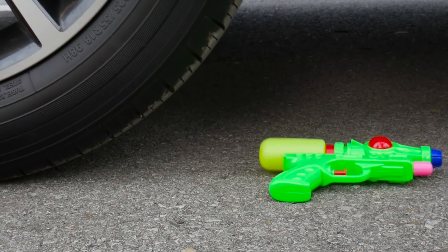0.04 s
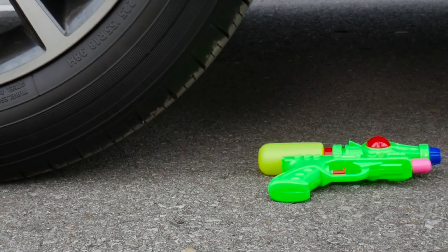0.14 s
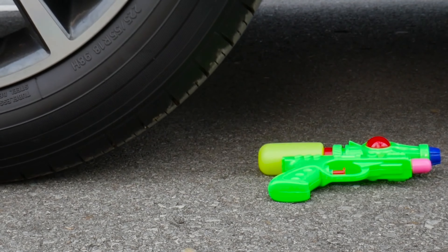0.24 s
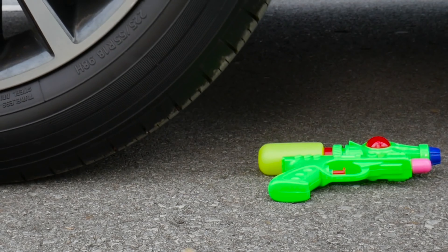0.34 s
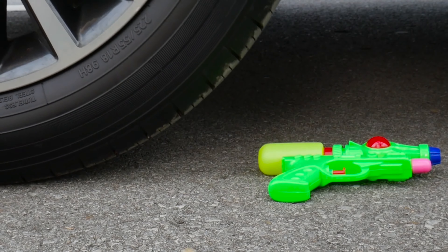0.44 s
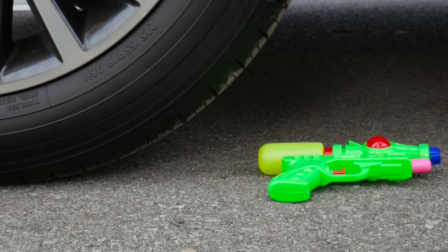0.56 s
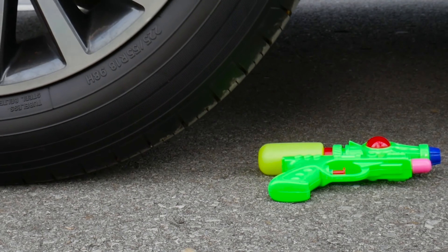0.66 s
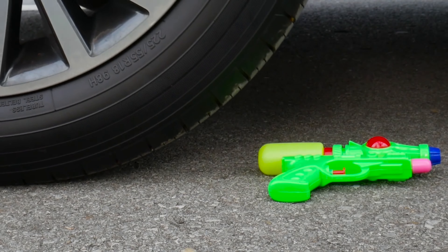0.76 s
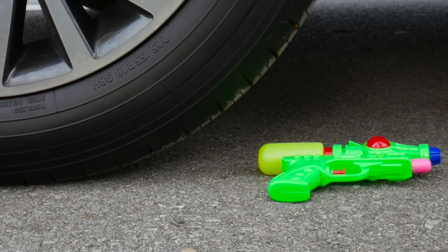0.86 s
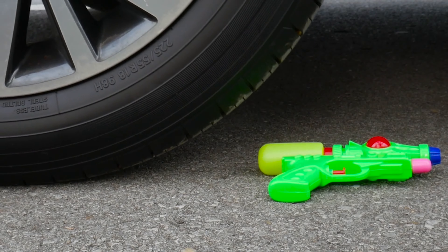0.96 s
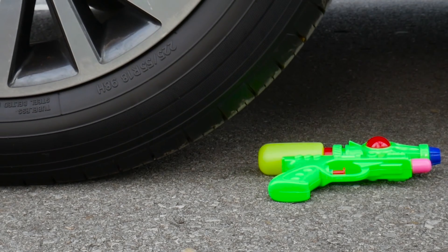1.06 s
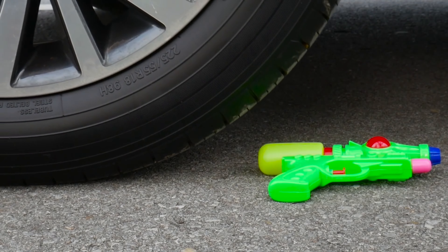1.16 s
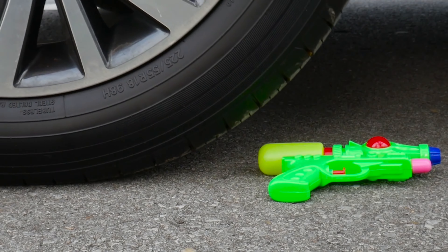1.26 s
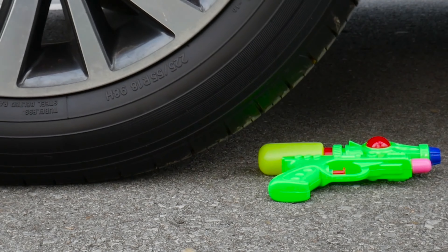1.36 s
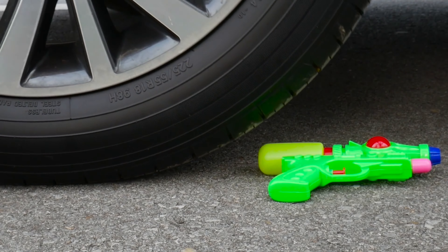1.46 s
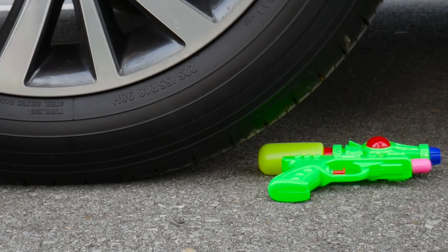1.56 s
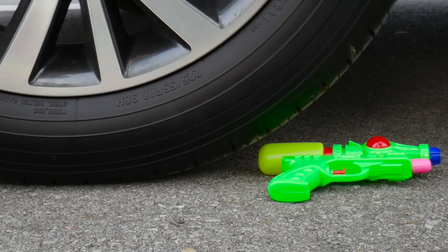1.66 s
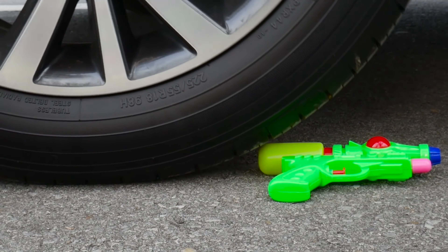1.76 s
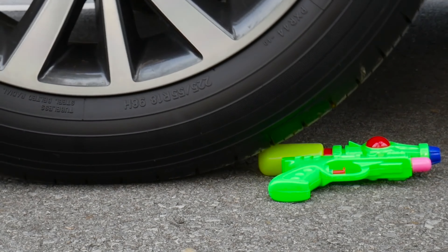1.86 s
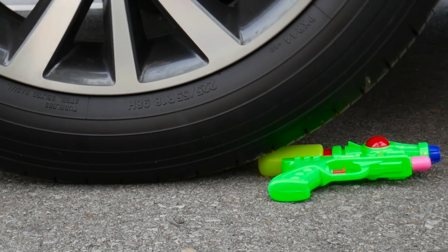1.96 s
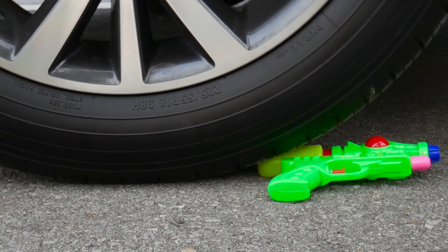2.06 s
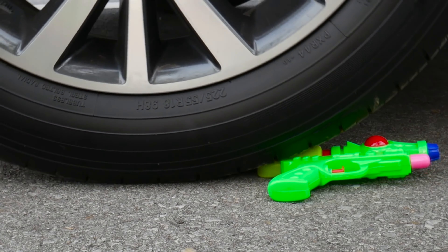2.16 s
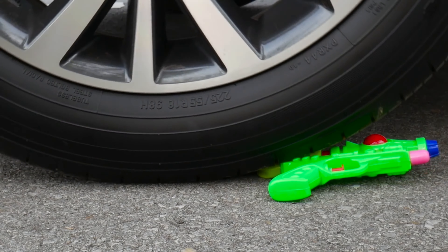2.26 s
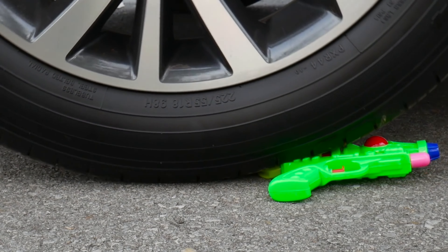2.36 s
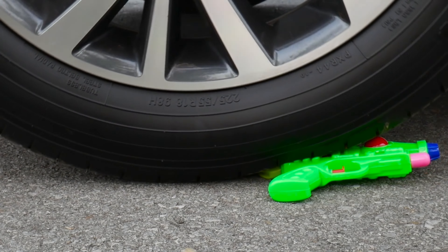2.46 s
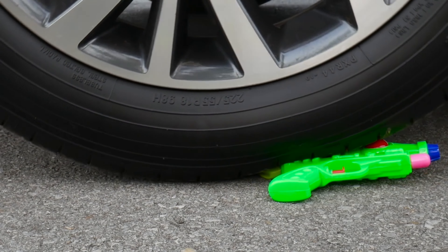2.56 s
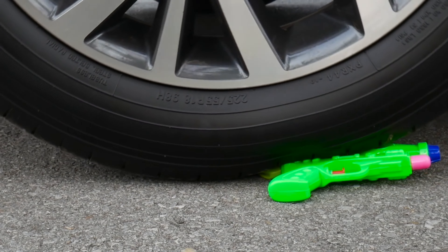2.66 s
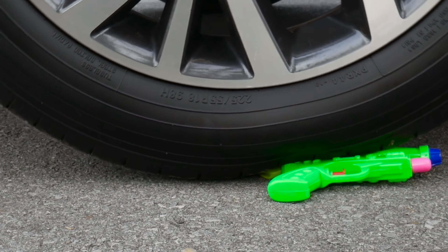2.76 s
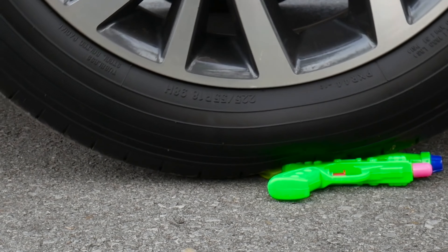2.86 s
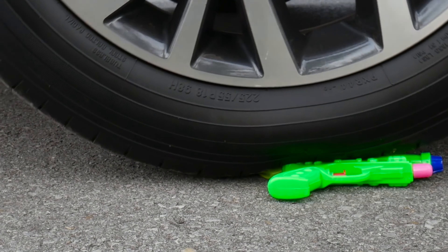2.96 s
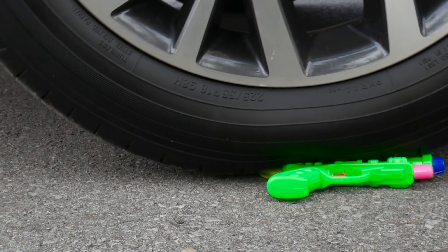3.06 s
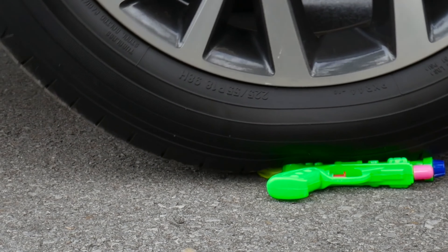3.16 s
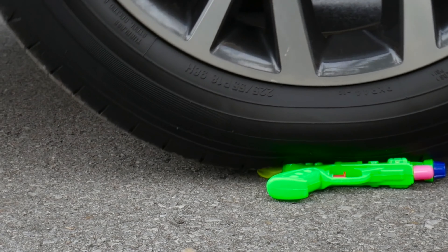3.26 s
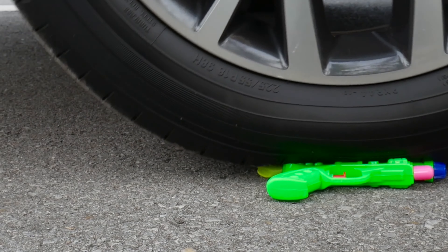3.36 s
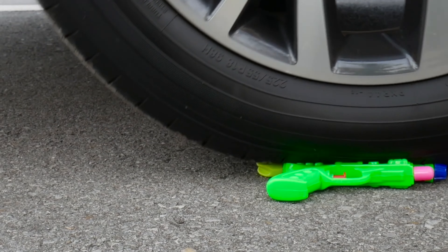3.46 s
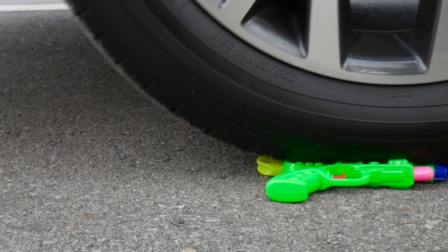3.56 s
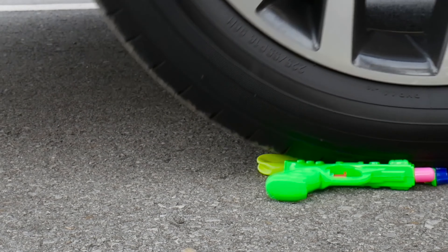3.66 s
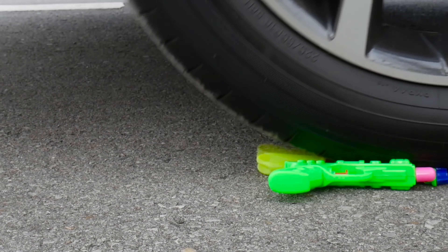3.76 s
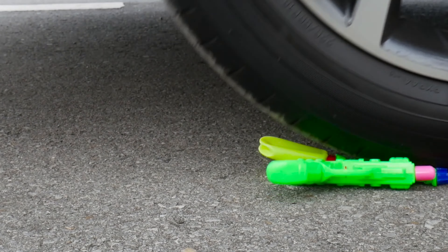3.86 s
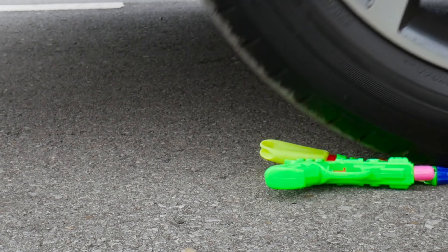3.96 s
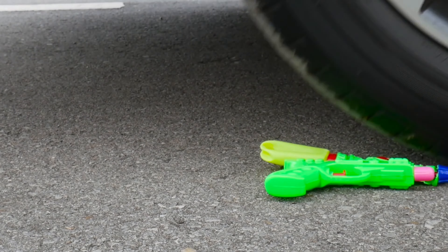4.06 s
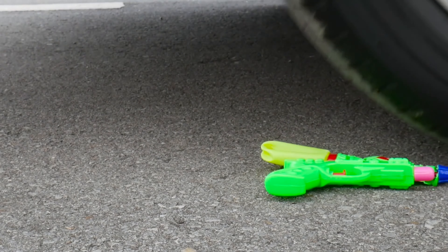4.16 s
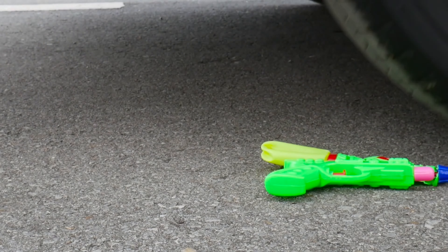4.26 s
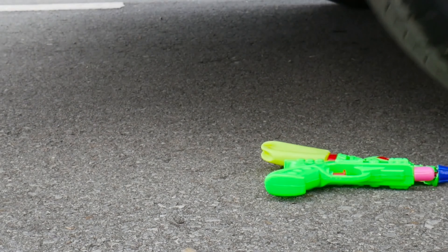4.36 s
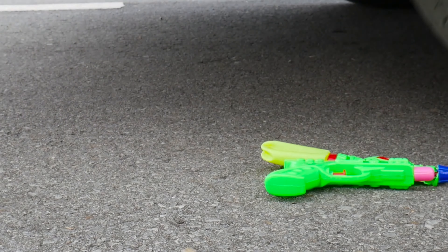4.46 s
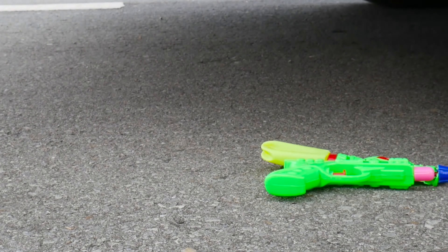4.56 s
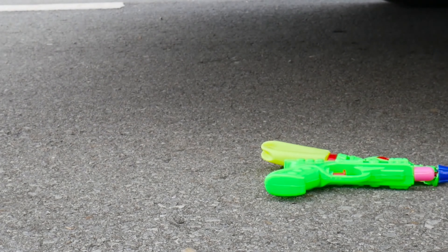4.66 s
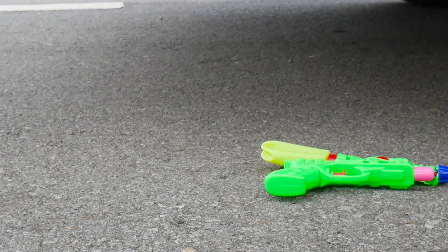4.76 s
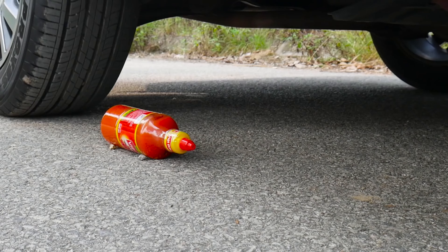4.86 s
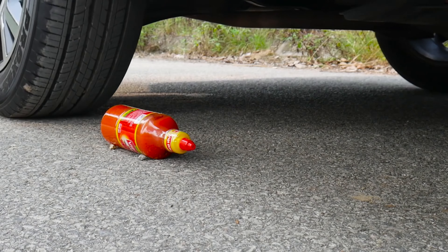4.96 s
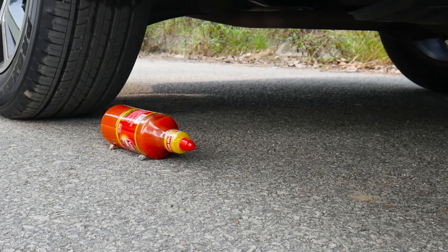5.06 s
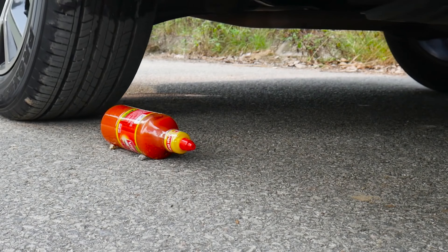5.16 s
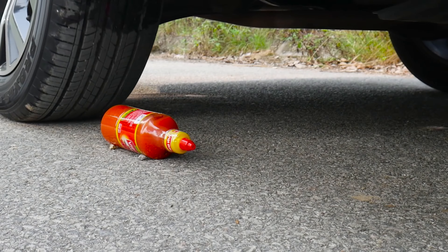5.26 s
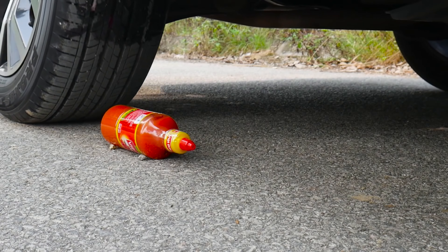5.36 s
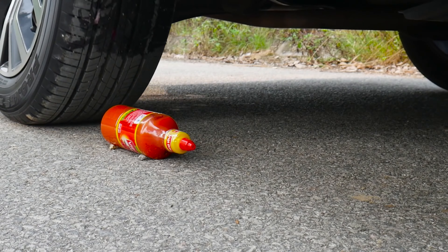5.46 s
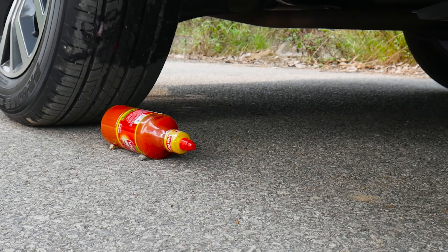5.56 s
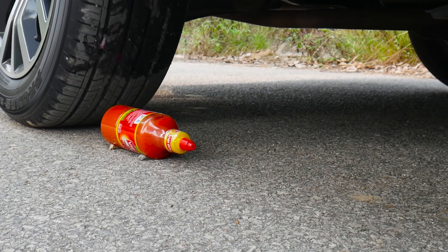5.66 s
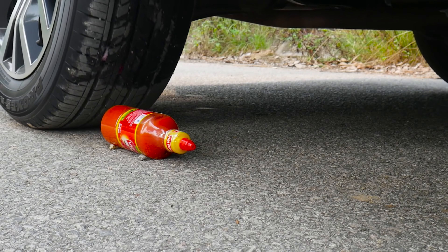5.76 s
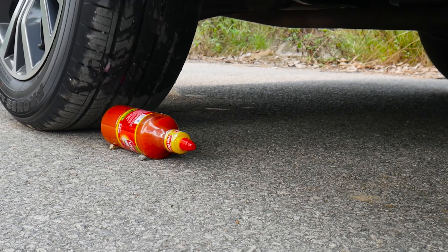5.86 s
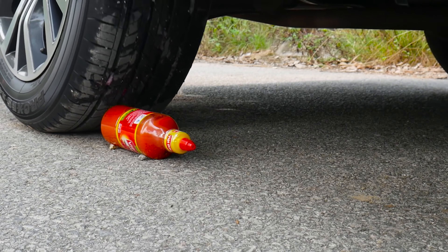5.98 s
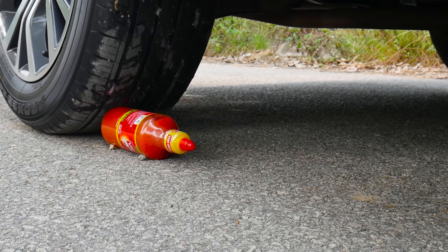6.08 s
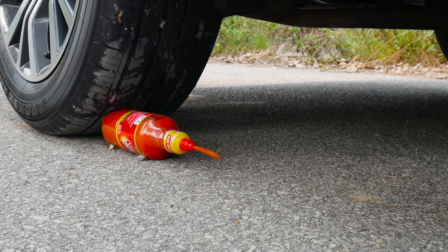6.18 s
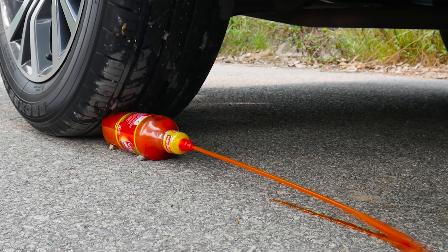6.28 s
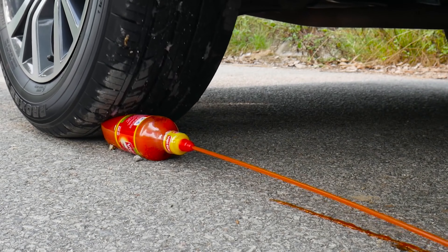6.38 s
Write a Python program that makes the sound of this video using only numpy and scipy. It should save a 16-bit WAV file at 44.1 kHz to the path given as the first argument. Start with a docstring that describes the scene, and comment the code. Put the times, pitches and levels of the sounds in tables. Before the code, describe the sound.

Brittle plastic crunches and snaps violently under a slow car wheel, engine idling softly; after a lull, a soft bottle buckles with a gurgling squirt.

```python
"""On asphalt, close to the tyre of an idling car that creeps over a plastic water pistol
and then noses into a plastic sauce bottle. Shells snap as noise bursts with a ringing pitch, so hard that
the stereo microphone overloads; random grains make the scrunch and the grit under the tread, jolts set
the air inside the tyre humming, and sauce gushes and glugs. The engine sums firing orders, rumble and whirr."""
import sys
import numpy as np
from scipy import signal
from scipy.fft import rfft, irfft
from scipy.io import wavfile
from scipy.ndimage import uniform_filter1d

SR = 44100
rng = np.random.default_rng(int(sys.argv[2]) if len(sys.argv) > 2 else 0)


def dump(signal):
    """Clip the signal to [-1, 1] and save it as 16-bit WAV at the path in sys.argv[1]."""
    limited = np.clip(np.atleast_2d(signal).T, -1, 1)
    pcm = np.round(limited * 32767).astype(np.int16)
    wavfile.write(sys.argv[1], SR, pcm)


N = 283122
TIME = np.arange(N) / SR

# plastic giving way; splinter and knock levels are the rms of their first 5 ms:
# (time [s], crack peak [dB], shell pitch [Hz], splinter treble [dB], knock [dB], knock pitch [Hz])
SNAPS = [(0.0098, -13, 3940, -36, -29.5, 980), (0.0309, -6.5, 4200, -22.5, -28, 1110),
         (0.0548, -25, 5370, -40, -28, 864), (0.0656, -16, 4100, -27, -33, 1005),
         (0.0961, -10.5, 3920, -44, -54, 500), (0.117, -11, 3440, -30, -48, 990),
         (2.2109, -20, 4370, -32, -53, 890), (2.3844, -0.5, 2680, -7, -21, 1150),
         (2.4563, -7.5, 2735, -11, -45, 940), (2.603, -1, 6550, -8, -20, 1180),
         (2.6284, 1, 3900, -7.5, -19, 1130), (2.6805, 1, 3120, -8.5, -19.5, 860),
         (2.699, -8.5, 6200, -19, -28.5, 1170), (2.7309, -1.5, 3930, -13.5, -29.5, 1150),
         (2.7629, -10.5, 6170, -24, -36.5, 1160), (2.7715, -8.5, 4100, -17, -29.5, 810),
         (2.7952, -10, 4940, -23, -39.5, 839), (2.8063, -8, 5670, -13.5, -32.5, 1170),
         (2.8154, -9.5, 5100, -14, -35.5, 578.5), (2.8285, -6, 4020, -16.5, -28.5, 815),
         (2.871, -1, 6900, -10, -22, 954), (2.9569, -6, 4190, -13, -28.5, 670),
         (3.0124, -2, 4590, -13, -23.5, 714), (3.054, 2, 4950, -10, -21.5, 1054),
         (3.092, -8, 4700, -20, -33.5, 694), (3.1074, 0.5, 3470, -8, -15.5, 1068),
         (3.1196, -10.5, 4050, -16, -31.5, 840), (3.1248, -11.5, 5000, -20.5, -35, 740),
         (3.1638, -7, 4980, -17, -36, 590), (3.1772, -4, 5200, -12, -32.5, 843.5),
         (3.2206, -8, 2290, -16, -35.5, 670), (3.251, -13, 6600, -20, -37, 1055),
         (3.266, -3.5, 4100, -10.5, -24, 588), (3.3006, -10.5, 2310, -16.5, -24, 830),
         (3.3651, -9.5, 4620, -18, -39, 860), (3.394, -6, 4530, -17.5, -37, 654),
         (3.4097, -6, 6600, -13.5, -38.5, 690), (3.424, -14.5, 7100, -26, -38, 900),
         (3.4464, 1.5, 4140, -14, -21, 577), (3.4544, -23, 2700, -18.5, -22.5, 884),
         (3.5035, -8, 3800, -15.5, -23, 760), (3.5563, -1.5, 4550, -11.5, -25.5, 746),
         (3.5757, -12.5, 1830, -20.5, -27.5, 830), (3.584, -22.5, 1310, -26, -27.5, 786),
         (3.632, -23, 6750, -15, -41, 666), (3.6384, -18, 4440, -31, -27, 833),
         (3.692, -3.5, 4570, -10.5, -28, 976), (3.7473, -9, 1950, -18, -26.5, 790),
         (3.7757, -12.5, 4720, -20, -21.5, 870), (3.8248, -19, 3830, -37, -31.5, 960),
         (3.847, -12.5, 2440, -25, -26.5, 780), (3.8513, -15, 3480, -17, -22, 794),
         (3.869, -30, 6000, -37, -29, 735), (3.925, -10.5, 3390, -25, -32, 547),
         (4.0431, -18.5, 2780, -28, -36.5, 684)]
# span of the pistol's crushing and its aftermath; span of the wheel's weight on it (start, end)
PISTOL_SPAN_S, LOADED_S = (2, 5), (2.55, 4.1)


def undb(db):
    """Amplitude of a level in dB."""
    return 10 ** (np.asarray(db) / 20)


def unit(x):
    """Scale x to rms 1."""
    return x / np.sqrt(np.mean(x ** 2))


def early_unit(x):
    """Scale x so that its first 5 ms have rms 1."""
    return x / np.sqrt(np.mean(x[:int(0.005 * SR)] ** 2))


def fade(t, t60):
    """Exponential decay by 60 dB in t60 seconds."""
    return np.exp(-np.log(1000) * t / t60)


def band(x, lo_hz, hi_hz, order=2):
    """Keep the band between two frequencies."""
    edges_hz = [lo_hz, min(hi_hz, SR / 2 - 500)]
    return signal.sosfilt(signal.butter(order, edges_hz, "band", fs=SR, output="sos"), x)


def colour(x, points):
    """Give x a smooth spectrum through (frequency [Hz], level [dB]) points; rms 1."""
    f = np.arange(N // 2 + 1) * SR / N + 1  # 1 Hz up, to avoid log(0)
    hz, db = np.transpose(points)
    gain = undb(np.interp(np.log(f), np.log(hz), db))
    return unit(irfft(rfft(x) * gain, N))


def walk(rate):
    """Smooth random wandering of rms 1, with `rate` new random values a second."""
    k = int(SR / rate)
    steps = np.repeat(rng.standard_normal(N // k + 1), k)
    return unit(uniform_filter1d(uniform_filter1d(steps, k), k)[:N])


def step(at_s, over_s):
    """A smooth change from 0 to 1."""
    return 0.5 + 0.5 * np.tanh((TIME - at_s) / over_s)


def add(out, at_s, x):
    """Mix x into out from a given moment on."""
    start = int(at_s * SR)
    out[start:start + len(x)] += x[:N - start]


def grains(rate, spread_db, t60):
    """Random tiny fractures, `rate` a second and of unequal size, each a short noise burst."""
    sizes = undb(spread_db * np.minimum(rng.exponential(size=N), 3.3))
    hits = (rng.random(N) < rate / SR) * sizes
    energy = signal.lfilter([1], [1, -fade(2 / SR, t60)], hits ** 2)
    return np.sqrt(energy) * rng.standard_normal(N)


def whirr(spectrum, lines, drift=0.005, unsteady_db=3):
    """Fan and belt noise with whining lines that drift and flutter."""
    out = colour(rng.standard_normal(N), spectrum)
    for hz, db in lines:
        phase = 2 * np.pi * np.cumsum(hz * (1 + drift * walk(16))) / SR
        out = out + undb(db) * unit(undb(unsteady_db * walk(31)) * np.sin(phase))
    return out


def engine(firing_hz=21.6, flicker_db=1.6, throb=0.12, unsteady_db=0.5, gas_db=-2):
    """Exhaust firing orders and gas rumble under an engine-bay whirr that throbs at the firing rate."""
    # exhaust tones: (multiple of the firing rate [1], level [dB])
    exhaust_orders = [(3, -4.5), (4, -1.5), (5, -5), (6, -3.5), (8, -9)]
    # whirr spectra beside and behind the wheel, and from the front: (frequency [Hz], level [dB])
    whirr_side = [(30, -21), (90, -8.5), (200, -4.5), (400, -0.5), (560, -2.5), (900, -0.5), (1550, -8),
                  (2600, -9.5), (3200, -5.5), (3700, -10), (5200, -17.5), (11000, -22.5), (15500, -31)]
    whirr_front = [(30, -4), (85, -7), (200, -7), (450, 1), (700, 4.5), (1100, 3), (1600, -5.5),
                   (3100, -3.5), (5500, -13.5), (8300, -15.5), (11000, -12.5), (15500, -23)]
    # whining belts and alternator: (frequency [Hz], level relative to the whirr [dB])
    whine_side = [(425, -12.5), (818, -11), (866, -14), (1007, -13.5)]
    whine_front = [(172.8, -12), (259, -15), (415, -15.5), (692, -9.5)]

    # heard from beside the wheel, from behind it once it has rolled past, then from the front
    past = step(4.7, 0.037)
    ahead = step(4.91, 0.01)
    beside_db = -50 - 2.5 * TIME  # fades by 2.5 dB a second
    side = (1 - ahead) * ((1 - past) * undb(beside_db) + past * undb(-63.5))
    front = ahead * undb(-55.5)
    exhaust = (1 - ahead) * ((1 - past) * undb(-71.5) + past * undb(-65.5)) + ahead * undb(-75)

    phase = 2 * np.pi * np.cumsum(firing_hz * (1 + 0.00035 * walk(6.9))) / SR
    hum = 0
    for order, db in exhaust_orders:
        tone = np.sqrt(2) * np.sin(order * phase + 2 * np.pi * rng.random())
        hum = hum + undb(db + unsteady_db * walk(1.9)) * tone
    # spent gas rumbles steadily
    hum = hum + undb(gas_db) * unit(band(rng.standard_normal(N), 55, 380))
    bay = side * whirr(whirr_side, whine_side) + front * whirr(whirr_front, whine_front)
    return exhaust * hum + bay * undb(flicker_db * walk(6.4)) * (1 + throb * np.sin(phase))


def splintering(full_snap_db=-28.5, build_t60=0.025, linger_t60=0.11):
    """Strength of the crackle around each snap under full load, and again as the tyre lets the shell go."""
    hits = np.zeros(N)
    for start_s, crack_db, *_ in SNAPS:
        if LOADED_S[0] < start_s < LOADED_S[1]:
            hits[int(start_s * SR)] += undb(crack_db)
    linger = lambda x, t60: signal.lfilter([1], [1, -fade(2 / SR, t60)], x + 1e-18)
    # run backwards, the same decay becomes the build-up before a snap
    energy = linger(hits, linger_t60) + linger(hits[::-1], build_t60)[::-1]
    let_go = undb(-37.5) * np.exp(-((TIME - 3.95) / 0.075) ** 2)
    return undb(full_snap_db) * np.sqrt(energy) + let_go


def crunches(count=1700, low_hz=1700, high_hz=5600, t60=0.009):
    """Tiny creases and chips: a dense scatter of pings, each with its own pitch and size; rms 1."""
    t = np.arange(SR // 20) / SR
    out = np.zeros(N)
    for when, pitch, size in rng.random((count, 3)):
        hz = low_hz * (high_hz / low_hz) ** pitch
        add(out, when * N / SR, size ** 4 * np.sin(2 * np.pi * hz * t) * fade(t, t60))
    return unit(out)


def tread(splinter_scrunch_db=-13, surge_db=2, crunch_splinter_db=-5, crunch_grit_db=-6):
    """Rubber scrunches on the asphalt while grit, small chips and fine, brighter splinters crackle under it."""
    # the tread bearing down on an object or loose grit:
    # (start [s], end [s], scrunch level [dB], grit crackle level [dB])
    presses = [(0, 0.138, -39, -36.5), (2.203, 4.026, -44.5, -54.5), (4.696, 4.72, -61, -84),
               (6.151, 6.42, -40, -49)]
    # spectra of rubber, grit and splinters: (frequency [Hz], level [dB])
    scrunch_tone = [(30, -15.5), (100, -4), (370, -4.5), (550, -3), (850, 0), (1500, -7.5), (3000, -12),
                    (6000, -17), (15000, -21)]
    grit_tone = [(300, -22), (1500, -3.5), (3000, 4), (4500, -1), (6000, -11.5), (11000, -8.5),
                 (15500, -22)]
    splinter_tone = [(300, -20), (1500, -7.5), (3000, 0), (4500, 0.5), (6000, -6), (10500, 2), (12500, -5),
                     (15500, -15)]
    rise_db_per_s, scrunch_fall_db_per_s, grit_fall_db_per_s = 181, 84, 161

    splinters = splintering()
    scrunch, grit = undb(splinter_scrunch_db) * splinters, 0
    for start_s, end_s, scrunch_db, grit_db in presses:
        onset_db = rise_db_per_s * np.minimum(TIME - start_s, 0)
        since = np.maximum(TIME - end_s, 0)
        scrunch = np.hypot(scrunch, undb(scrunch_db + onset_db - scrunch_fall_db_per_s * since))
        grit = np.hypot(grit, undb(grit_db + onset_db - grit_fall_db_per_s * since))
    stones = colour(grains(rate=800, spread_db=3, t60=0.008), grit_tone)
    shards = colour(grains(rate=400, spread_db=5.5, t60=0.005), splinter_tone)
    rubber = colour(grains(rate=1000, spread_db=-0.5, t60=0.033), scrunch_tone)
    crackle = grit * stones + splinters * unit(undb(surge_db * walk(45)) * shards)
    chips = (undb(crunch_splinter_db) * splinters + undb(crunch_grit_db) * grit) * crunches()
    return scrunch * rubber + crackle + chips


def groans(edge_s=0.011, width=0.23, slips_per_s=540):
    """Irregular slips of sticky rubber on hollow plastic excite one broad resonance of the object."""
    # (start [s], end [s], resonance [Hz], level [dB])
    rubs = [(0, 0.1, 1020, -36), (0.1, 0.17, 1150, -43), (2.11, 2.38, 370, -49), (2.675, 2.72, 285, -35),
            (3.84, 3.885, 485, -41)]
    out = np.zeros(N)
    for start_s, end_s, hz, db in rubs:
        slips = grains(rate=slips_per_s, spread_db=4.5, t60=0.0012)
        body = unit(band(slips, hz / (1 + width), hz * (1 + width)))
        out += undb(db) * body * step(start_s, edge_s) * (1 - step(end_s, edge_s))
    return out


def snap(t, row, noise, splinter_t60=0.012, knock_t60=0.022, scuff_db=2, thump_db=-31, thump_t60=0.0087,
         below=0.45, above=1.68, knock_thump_db=-15, overtone_ratio=1.4, overtone_db=-5):
    """One fracture: a burst of tearing, a ring of the shell, and a knock as the piece hits tyre and road."""
    start_s, crack_db, shell_hz, splinter_db, knock_db, knock_hz = row
    loaded = LOADED_S[0] < start_s < LOADED_S[1]
    crack_t60 = 0.013 if loaded else 0.018
    # only the pistol's first cracks, before the weight is on it, ring out freely
    free = PISTOL_SPAN_S[0] < start_s < LOADED_S[0]
    # decay of a piece pitched at 3 kHz, and level of its ring against the tearing
    ring_t60, shell_db = (0.028, -0.5) if free else (0.011, -2.5)
    shell_t60 = ring_t60 * (3000 / shell_hz) ** 0.22  # higher pieces die sooner
    attack = 1 - np.exp(-t / 0.0004)

    # small stiff pieces crack higher than large soft ones
    tear = band(noise[0] * attack * fade(t, crack_t60), below * shell_hz, above * shell_hz)
    shell = np.sin(2 * np.pi * shell_hz * t) * attack * fade(t, shell_t60)
    # a shell that rings for longer also holds more of the energy
    shell_gain = undb(shell_db) * np.sqrt(shell_t60 / crack_t60)
    crack = early_unit(tear) + shell_gain * early_unit(shell)
    crack = undb(crack_db) * crack / np.abs(crack).max()

    # fine splinters fill the treble above the main crack
    splinter_lo_hz = np.clip(above * shell_hz, 4300, 6500)
    splinter = band(noise[1] * attack * fade(t, splinter_t60), splinter_lo_hz, 13000, order=3)

    wall = np.sin(2 * np.pi * knock_hz * t)
    wall = wall + undb(overtone_db) * np.sin(2 * np.pi * overtone_ratio * knock_hz * t)
    knock = early_unit(wall * attack * fade(t, knock_t60))
    scuff = early_unit(band(noise[2] * fade(t, knock_t60), 0.45 * knock_hz, 2.34 * knock_hz))
    knock = early_unit(knock + undb(scuff_db) * scuff)

    # the rubber takes up the sudden release with a dull thump
    thump = early_unit(band(fade(t, thump_t60 / 10) + noise[3] * fade(t, thump_t60), 48, 560))
    thump = undb(max(crack_db + thump_db, knock_db + knock_thump_db)) * thump
    return crack + undb(splinter_db) * early_unit(splinter) + undb(knock_db) * knock + thump


def plastic():
    """All the snaps of the breaking shells, each at its moment."""
    size = 4096
    t = np.arange(size) / SR
    out = np.zeros(N)
    for row, noise in zip(SNAPS, rng.standard_normal((len(SNAPS), 4, size))):
        add(out, row[0], snap(t, row, noise))
    return out


def splinter_ticks(t60=0.026, rise_s=0.0003, spread=1.3):
    """Small splinters, too light to knock, part with one short, bright tick of band-limited noise each."""
    # (time [s], peak level [dB], pitch [Hz])
    ticks = [(0.151, -25, 3500), (2.3054, -22.5, 9600), (2.357, -20.5, 9100), (2.7544, -11.5, 11000),
             (2.949, -17, 8430), (2.9806, -21, 6830), (3.0084, -10, 8890), (3.1915, -15, 10000),
             (3.2406, -20, 5400), (3.472, -12.5, 8550), (3.672, -26, 11640), (3.729, -14, 6500),
             (3.8928, -17.5, 10100), (3.912, -18, 6000), (3.9402, -12.5, 11700), (3.95, -15.5, 9600),
             (4.061, -21.5, 3500), (6.1627, -31, 6500), (6.1952, -20, 9600), (6.202, -21, 6300),
             (6.328, -24, 3200)]
    size = 2048
    t = np.arange(size) / SR
    out = np.zeros(N)
    burst = (1 - np.exp(-t / rise_s)) * fade(t, t60)
    for (start_s, db, hz), noise in zip(ticks, rng.standard_normal((len(ticks), size))):
        tick = band(noise * burst, hz / spread, min(hz * spread, 12500), order=1)
        add(out, start_s, undb(db) * tick / np.abs(tick).max())
    return out


def pistol_body(x):
    """The hollow toy rings on at its own modes during and after the crushing."""
    # (frequency [Hz], decay by 60 dB [s], level at resonance [dB])
    modes = [(640, 0.037, -8), (824, 0.091, -15), (4540, 0.0054, -4), (6000, 0.29, -14.5),
             (6770, 0.039, -9.5), (11000, 0.05, -7)]
    t = np.arange(SR // 5) / SR
    in_span = (TIME > PISTOL_SPAN_S[0]) & (TIME < PISTOL_SPAN_S[1])
    ring = 0
    for hz, t60, db in modes:
        decay = fade(t, t60)
        ring = ring + undb(db) * 2 * np.cos(2 * np.pi * hz * t) * decay / decay.sum()
    return signal.fftconvolve(x * in_span, ring)[:N]


def tyre_air(rise_s=0.017, waver=0.006, shake_db=3.5, overtone_db=-35, overtone_hz=452):
    """Each jolt rings the tyre's cavity, wavering in pitch and level; a weak overtone lingers."""
    # the tyre drops as a wall collapses: (time [s], pitch [Hz], level before rise and decay [dB],
    # decay by 60 dB [s])
    jolts = [(2.612, 228.7, -37.5, 0.9), (2.852, 231, -32, 0.24), (2.94, 205, -42, 0.45),
             (3.1, 232, -31, 0.32), (3.15, 204, -40, 1.8), (3.553, 244, -32.5, 0.18),
             (3.725, 204, -39, 1.7)]
    load = 1 + waver * walk(16)

    def tone(hz):
        return unit(undb(shake_db * walk(30)) * np.sin(2 * np.pi * np.cumsum(hz * load) / SR))

    hum = strength = 0
    for start_s, hz, db, t60 in jolts:
        t = np.maximum(TIME - start_s, 0)
        ring = undb(db) * (1 - np.exp(-t / rise_s)) * fade(t, t60)
        hum = hum + ring * tone(hz)
        strength = np.hypot(strength, ring)
    # the square root lets the overtone outlast the hum
    hum = hum + undb(overtone_db) * np.sqrt(strength) * tone(overtone_hz)
    # it dies away once the tyre is back on flat road
    return hum * np.interp(TIME, [4.1, 4.35], [1, 0])


def creak(start_s=3.3186, gap_s=0.0063, t60=0.0075, level_db=-5,
          count=7, hardest=4, swell_db=1.6, rasp=0.69, rise_s=0.00075, scatter=0.029):
    """Two crushed parts stick and slip in an even run of pings that swells and eases, varying in pitch."""
    # what the creaking parts ring with: (frequency [Hz], level [dB])
    modes = [(2450, -9.5), (4450, -2), (6900, -11)]
    t = np.arange(SR // 20) / SR
    out = np.zeros(N)
    for k, chance in enumerate(rng.standard_normal(count)):
        ping = rasp * band(rng.standard_normal(len(t)), 2000, 13000)
        for hz, db in modes:
            ping = ping + undb(db) * np.sin(2 * np.pi * hz * (1 + scatter * chance) * t)
        size = undb(level_db - swell_db * abs(k - hardest))
        add(out, start_s + k * gap_s, size * ping * (1 - np.exp(-t / rise_s)) * fade(t, t60))
    return out


def buckles(t60=0.0045, rise_s=0.0006):
    """A whole wall flips with a solid thud, swinging through about once before the rubber stops it."""
    # (time [s], pitch [Hz], peak level [dB])
    flips = [(3.692, 679, 0), (6.3656, 455, -12.5)]
    t = np.arange(SR // 20) / SR
    out = np.zeros(N)
    for start_s, hz, db in flips:
        swing = np.sin(2 * np.pi * hz * t) * (1 - np.exp(-t / rise_s)) * fade(t, t60)
        swing = band(swing, 190, 2500, order=1)
        add(out, start_s, undb(db) * swing / np.abs(swing).max())
    return out


def sauce(uneven_db=2, rise_s=0.007, glug_rise_s=0.0093, glug_t60=0.084, glide_per_s=1.5):
    """Thick liquid churns low and unevenly as the bottle wall caves in, and glugs as air passes through it."""
    # pockets of air, each rising a little in pitch: (time [s], starting pitch [Hz], level [dB])
    glugs = [(6.159, 244, -37.5), (6.16, 680, -37), (6.307, 102, -38), (6.368, 221, -29), (6.386, 111, -33),
             (6.388, 657, -35)]
    # pushed along as the bottle is pinched, gushing when its wall buckles
    pinch_s, gush_s = 6.13, 6.37
    gush = step(gush_s, rise_s) * fade(np.maximum(TIME - gush_s, 0), 0.4)
    push = undb(-48) * step(pinch_s, rise_s) + undb(-34) * gush
    churn = band(rng.standard_normal(N), 83, 350) * undb(uneven_db * walk(44))
    out = push * unit(churn)

    t = np.arange(SR // 2) / SR
    swell = (1 - np.exp(-t / glug_rise_s)) * fade(t, glug_t60)
    for start_s, hz, db in glugs:
        phase = 2 * np.pi * np.cumsum(hz * (1 + glide_per_s * t)) / SR
        add(out, start_s, undb(db) * np.sin(phase) * swell / swell.max())
    return out


def bottle(rise_s=0.00032, crease_db=-1, crease_t60=0.006, below=0.68, above=1.49,
           knock_t60=0.021, knock_lo_hz=650, knock_hi_hz=1800):
    """The soft, filled wall creases and flips in, rings until the sauce damps it, and knocks on the road."""
    # dull pops; knock level is the rms of its first 5 ms:
    # (time [s], pop peak [dB], wall pitch [Hz], ring decay by 60 dB [s], knock level [dB])
    pops = [(6.2023, -25.5, 1270, 0.019, -29), (6.2331, 1.5, 5070, 0.0022, -23.5),
            (6.2913, -23, 4440, 0.026, -52), (6.3598, -9, 3160, 0.0094, -35),
            (6.3655, 2.5, 1770, 0.0092, -15.5), (6.3804, -16, 3320, 0.015, -42),
            (6.3964, -7, 2750, 0.028, -44)]
    size = 4096
    t = np.arange(size) / SR
    out = np.zeros(N)
    attack = 1 - np.exp(-t / rise_s)
    for row, noise in zip(pops, rng.standard_normal((len(pops), 2, size))):
        start_s, db, hz, t60, knock_db = row
        ring = np.sin(2 * np.pi * hz * t) * attack * fade(t, t60)
        crease = noise[0] * attack * fade(t, min(t60, crease_t60))
        crease = band(crease, below * hz, above * hz, order=3)
        # a wall that rings freely creases less
        crease_gain = undb(crease_db) * min(crease_t60 / t60, 1) ** 0.22
        pop = early_unit(ring) + crease_gain * early_unit(crease)
        knock = early_unit(band(noise[1] * fade(t, knock_t60), knock_lo_hz, knock_hi_hz))
        add(out, start_s, undb(db) * pop / np.abs(pop).max() + undb(knock_db) * knock)
    return out


def underbody(x, near_db=-16, near_t60=0.064, far_db=-28, far_t60=0.28, width=0.16):
    """Quick reflections between road, wheel arch and floor pan, and a faint duller tail."""
    t = np.arange(SR // 2) / SR
    common, apart = rng.standard_normal((2, len(t)))
    apart = width * band(apart, 1500, 11000, order=1)
    build = 1 - np.exp(-t / 0.0076)
    out = []
    for sign in (1, -1):
        # the two capsules sit close together: in the first reflections mainly the treble differs
        near = band(common + sign * apart, 150, 8600, order=1) * build * fade(t, near_t60)
        far = band(rng.standard_normal(len(t)), 200, 5900, order=1) * build * fade(t, far_t60)
        response = undb(near_db) * near / np.linalg.norm(near)
        response = response + undb(far_db) * far / np.linalg.norm(far)
        out.append(signal.fftconvolve(x, response)[:N])
    return np.array(out)


def scene():
    """Crushing plastic and tread under the car, the humming tyre, the sauce and the engine."""
    crush = plastic() + splinter_ticks() + bottle() + creak() + tread() + groans()
    crush = crush + pistol_body(crush) + buckles()
    return crush + underbody(crush) + tyre_air() + sauce() + engine()


def record(dry, top_hz=16000):
    """The left capsule hears everything one sample later; both overload near full scale, then lose the top."""
    capsules = np.array([np.append(0, dry[0, :-1]), dry[1]])
    clipped = capsules / (1 + capsules ** 8) ** (1 / 8)
    return signal.sosfilt(signal.ellip(8, 0.2, 70, top_hz, fs=SR, output="sos"), clipped)


dry = scene()
out = record(dry)
dump(out)
```